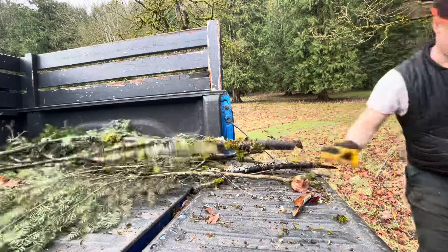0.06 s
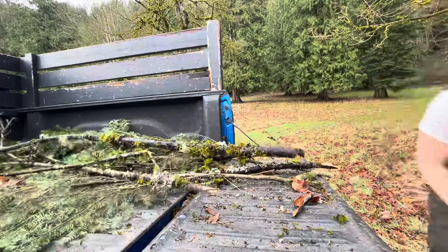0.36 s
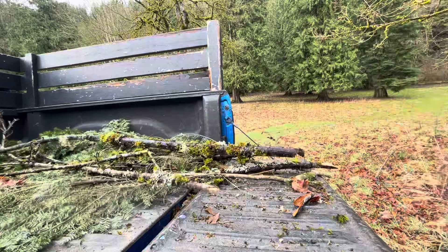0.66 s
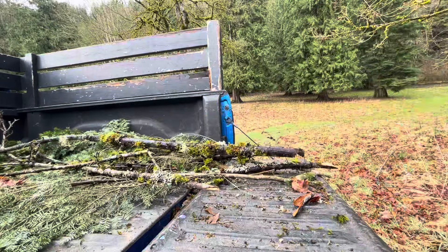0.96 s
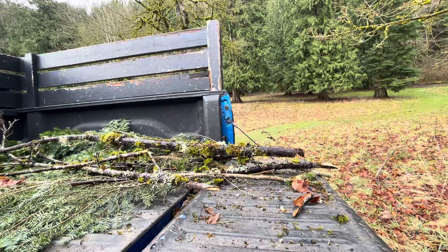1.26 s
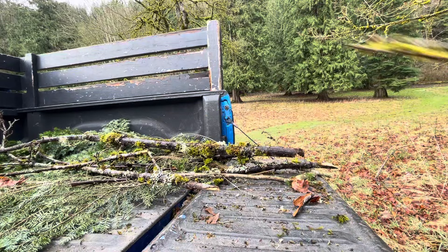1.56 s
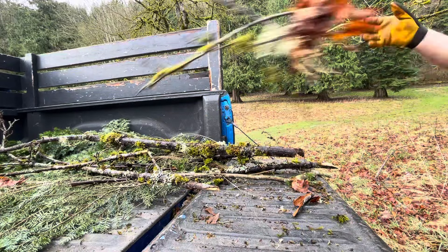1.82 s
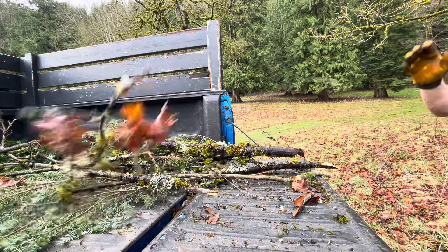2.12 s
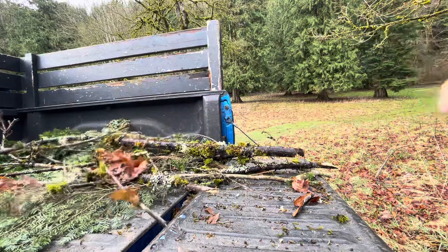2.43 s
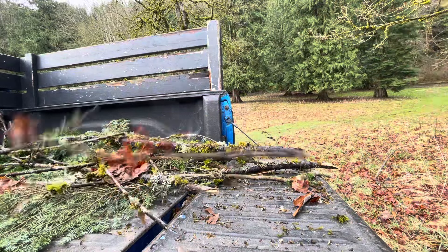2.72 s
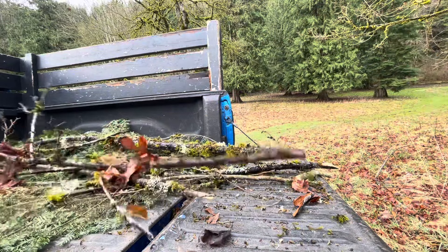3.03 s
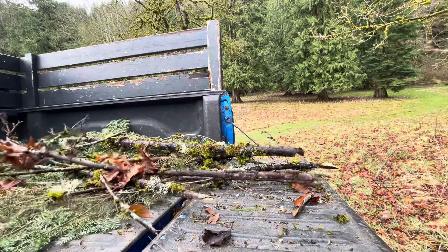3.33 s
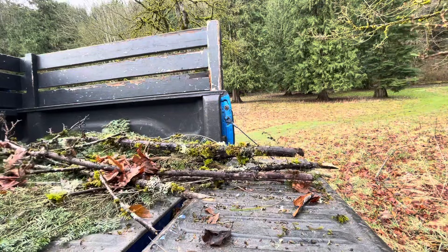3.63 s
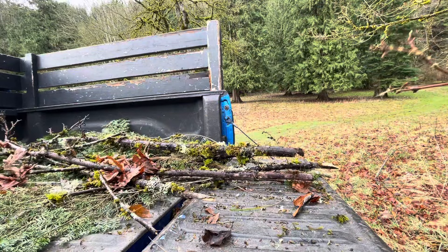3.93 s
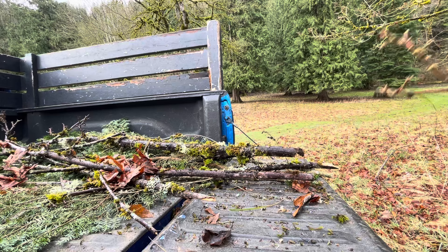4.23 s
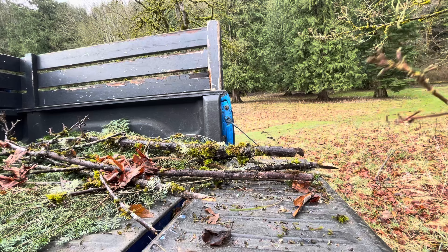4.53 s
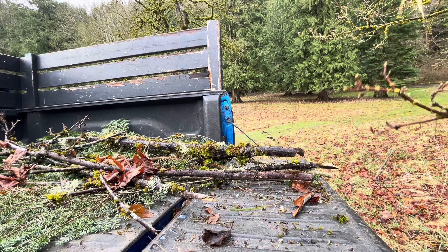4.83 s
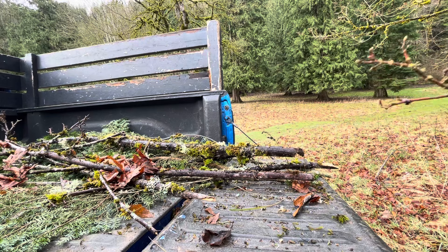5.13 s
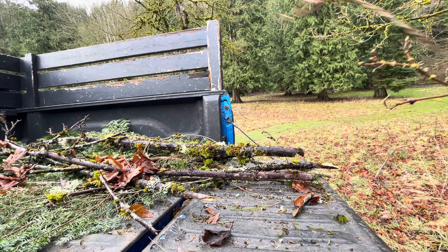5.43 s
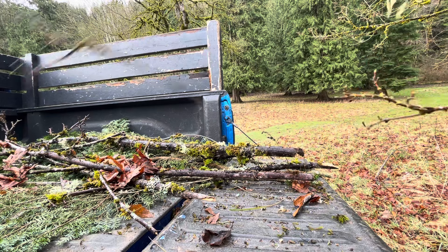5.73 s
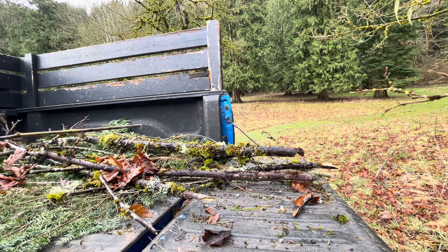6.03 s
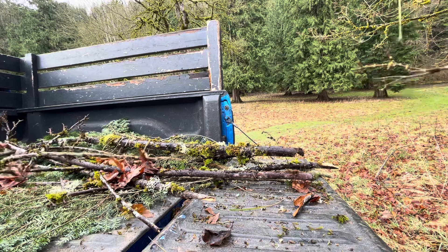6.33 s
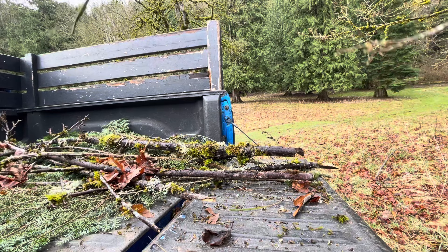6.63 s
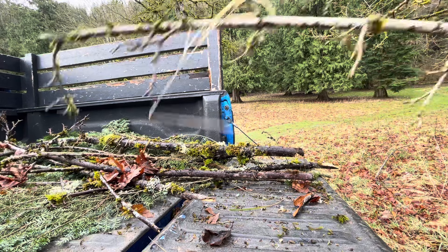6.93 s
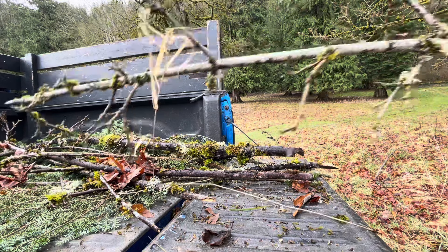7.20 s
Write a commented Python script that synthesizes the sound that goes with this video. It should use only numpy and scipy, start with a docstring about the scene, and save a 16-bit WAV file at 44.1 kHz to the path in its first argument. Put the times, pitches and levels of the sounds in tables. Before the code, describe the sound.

Branches knock and clatter onto a brush pile in a booming truck bed, and a stick snaps sharply between throws.

```python
"""On a pasture, branches are tossed onto a pile in the bed of a pickup truck.
Each landing knocks and makes the bed boom while twigs crack and the pile rustles and settles.
Between throws, someone walks through fallen leaves and snaps a stick, whose halves ring.
The trees send back a faint echo over quiet air."""
import sys
import numpy as np
from scipy import signal
from scipy.fft import rfft, irfft, next_fast_len
from scipy.io import wavfile
from scipy.ndimage import uniform_filter1d

SR = 44100
rng = np.random.default_rng(int(sys.argv[2]) if len(sys.argv) > 2 else 0)


def generate_wav(sig):
    """Save sig (samples, or channels by samples) to the path in sys.argv[1] as 16-bit PCM at SR."""
    pcm = np.round(np.clip(np.atleast_2d(sig).T, -1, 1) * 32767).astype(np.int16)
    wavfile.write(sys.argv[1], SR, pcm)


N = 328986
TIME_S = np.arange(N) / SR
PILE_LAG_S, FIELD_LAG_S = -.00026, .00028   # arrival at the left microphone minus the right

# Blows of wood on wood and on the bed; pan is left minus right throughout:
# start_s, thud_db, pitch_hz, ring_db, ring_t60_s, boom_db, bark_db, pan_db
BLOWS = [(-0.04, -53, 140, -42, 0.41, -43, -52, 12), (0.07, -45, 150, -61, 0.18, -48, -70, 11),
         (0.123, -50.5, 722, -40.5, 0.18, -44, -40, 4), (0.189, -44.5, 438, -49, 0.18, -56, -48, 4),
         (0.74, -51.5, 424, -36.5, 0.051, -83, -46.5, -6.5), (1.243, -63, 560, -43, .04, -90, -49, -2),
         (2.013, -48, 460, -62, .2, -47.5, -66, 5.5), (2.08, -35.5, 96.7, -30, 0.45, -36, -42, 9.5),
         (2.115, -35, 113, -42, 0.14, -41, -35, 6), (2.1636, -19.5, 336, -4.5, 0.14, -35, -29.5, 2.5),
         (2.175, -29.5, 483, -16, 0.17, -42, -51.5, 3.5), (2.203, -33, 397, -17.5, 0.27, -38, -54, 4),
         (2.305, -20.5, 470, -27, 0.085, -39.5, -26, 3.5), (2.33, -37.5, 629, -27.5, 0.15, -46, -46, 20),
         (2.466, -40, 450, -48, 0.14, -46.5, -42, 7.5), (2.622, -14.5, 496, -9, 0.085, -28, -17, 7.5),
         (2.635, -19, 284.8, -13.5, 0.23, -35, -44, 3),
         (2.692, -25.5, 282.5, -24.5, 0.27, -34.5, -47, 13.5),
         (2.770, -22.5, 403, -21, 0.13, -34, -22.5, 2.5), (2.826, -39, 66, -26, 0.28, -46, -60, 1),
         (2.817, -33, 581, -36, 0.37, -38, -46, 11), (2.874, -24.5, 86, -26.5, 0.1, -38, -56, 14),
         (2.929, -28.5, 103, -27, 0.16, -50, -67, 11.5), (3.008, -44, 410, -36, 0.27, -51, -73, 5),
         (3.055, -30, 530, -31, 0.13, -38, -45, 8.5), (3.079, -32.5, 305, -28, 0.21, -40, -51, 10),
         (3.138, -37, 519, -35, 0.16, -38, -46.5, 10), (3.169, -47, 89.7, -31, 0.32, -39.5, -66, 20.5),
         (3.178, -34, 274, -22.5, 0.18, -61, -61, 7), (3.239, -44.5, 254.6, -41, 0.51, -51.5, -44, 7),
         (3.359, -64, 279, -56, 0.36, -63, -59, -1), (3.5, -61, 269.4, -56.5, 0.42, -65.5, -73.5, 9.5),
         (5.851, -52, 406, -38.5, 0.14, -62, -39.5, -0.5), (5.893, -46, 538, -32.5, 0.2, -63, -49, 1),
         (5.907, -31.5, 150.4, -21.5, 0.17, -51.5, -52.5, 8),
         (5.911, -26.5, 474, -17.5, .14, -47, -21, 2.5), (5.918, -30, 313.3, -16, 0.21, -40.5, -35, 3.5),
         (5.921, -44, 627, -28.5, 0.21, -53, -33, 7), (5.93, -30.5, 174, -11, 0.1, -46, -28, 10.5),
         (5.939, -30.5, 399.7, -19, 0.21, -54.5, -35, 4.5), (5.974, -48, 188, -26.5, 0.28, -63, -68, 10.5),
         (6.04, -54.5, 299.6, -39, 0.21, -68.5, -70, 3.5), (6.13, -56, 191.6, -42.5, 0.4, -76, -76, 4),
         (6.208, -47, 411.6, -34, 0.27, -51, -49.5, 4.5), (6.255, -46.5, 135.6, -42, 0.36, -53.5, -50, 11),
         (6.998, -50, 729, -44, 0.29, -62, -43, 6), (7.041, -54.5, 186, -59, 0.18, -65, -40.5, 7.5)]
# Boots crushing leaves: peak_s, level_db, swell_s, fade_s, treble_db
LEAF_CRUNCHES = [(0.771, -49, 0.063, 0.13, -0.5), (0.812, -49.5, 0.043, 0.023, -5),
                 (1.375, -51, 0.087, .05, -3.5), (1.42, -50.5, 0.075, 0.11, 4.5),
                 (1.475, -50, 0.038, 0.057, -17), (1.637, -43.5, 0.04, .11, 4.5),
                 (4.006, -51.5, 0.037, 0.12, 1), (4.06, -51.5, 0.09, 0.14, 1),
                 (7.222, -50, 0.21, 0.202, 0.5)]
# Feet and boughs sweeping over leaves: peak_s, level_db, swell_s, fade_s, treble_db
LEAF_SWISHES = [(0.982, -53.5, 0.063, 0.072, 0.5), (1.095, -51.5, 0.1, 0.15, -1.5),
                (1.54, -62, .1, 0.63, 0), (1.879, -58, 0.3, 0.11, 2), (3.6, -57.5, 0.37, 0.14, -4.5),
                (3.772, -54, 0.1, 0.1, -5), (3.9, -65.5, .2, 0.16, 2), (4.2, -65, 0.11, 0.31, 1),
                (4.74, -60.5, 0.11, 0.21, 2), (5.0, -66.5, 0.51, 0.88, -8.5), (5.25, -67, 0.052, .15, -1),
                (5.36, -60.5, 0.12, 0.13, -2), (5.55, -64.5, 0.1, 0.086, -8), (5.68, -57.5, 0.074, .15, -2),
                (5.76, -54, 0.16, 0.16, -2), (6.641, -49, 0.049, 0.087, 2), (6.73, -63, 0.077, 0.33, 3),
                (6.96, -74, 0.041, .1, 11.5), (7.04, -55, 0.11, 0.054, 2), (7.13, -59, .1, .1, 2),
                (7.45, -63, 0.13, 0.31, 2)]


def branch_landings(thud_spread=1.428, mode_reach=2.8, contact_s=0.0032):
    """Each blow gives a dull thud, a ring of the branch's bending mode, a bark clack and a bed boom."""
    # Truck bed modes: mode_hz, level_db, t60_s
    bed_modes = [(68, -5, 0.7), (92, -4, 0.45), (133.5, -8, .4), (157.4, -7, 0.45), (176, -6.5, 0.33),
                 (205, -7, .4), (269.3, -1.5, 0.5), (320, -1.5, .36), (357, -4, 0.26), (399, -5, .3),
                 (495, -4, .28), (598, -2, .36), (679, -4, .36), (745, -6, .32), (1192, -17.5, 0.3),
                 (1312, -16, .3), (1463, -20, .26)]
    out, t = np.zeros((2, N)), np.arange(int(.6 * SR)) / SR
    modes_hz = np.array(bed_modes)[:, 0]
    modes = np.array([damped_mode(t, *mode) for mode in bed_modes])
    cushion = 1 - np.exp(-t / contact_s)   # moss and needles soften the blow
    for start_s, thud_db, pitch_hz, ring_db, ring_t60_s, boom_db, bark_db, pan_db in BLOWS:
        thud_t60_s = 0.22 * np.exp(-0.0058 * (thud_db + 21))   # hard blows bury the branch
        knock = burst(t, pitch_hz / thud_spread, pitch_hz * thud_spread, thud_t60_s)
        knock *= from_db(thud_db + 0.5)
        knock[0] += damped_mode(t, pitch_hz, ring_db, ring_t60_s)   # direct path only
        signs = rng.choice([-1, 1], (2, len(modes)))
        strengths = signs * from_db(rng.normal(0, 4.065, signs.shape))   # depend on where it lands
        softness = 1 / np.hypot(1, (modes_hz / (mode_reach * pitch_hz)) ** 2)   # dull blows miss highs
        boom = from_db(boom_db - 1) * (strengths * softness) @ modes
        clack = from_db(bark_db - 9) * burst(t, low_hz=700, high_hz=1600, t60_s=0.15)
        add(out, start_s, placed((knock + boom + clack) * cushion, 0, pan_db, PILE_LAG_S))
    return out


def pile_rustle():
    """Twigs and needles rub as the pile gives under a branch and settles."""
    # Shifts of the pile: peak_s, level_db, swell_s, fade_s
    shifts = [(0.02, -64.5, 0.19, 1), (0.19, -53, 0.93, 0.36), (2.07, -44.5, 0.15, 0.48),
              (2.178, -37, 0.043, 0.14), (2.31, -58.5, 0.22, 0.41), (2.63, -52, 0.014, 0.13),
              (2.765, -40, 0.032, 0.17), (2.98, -53.5, 0.35, 0.91), (5.91, -34, 0.035, 0.035),
              (5.978, -45, 0.015, 0.023), (6.205, -52.5, 0.056, 0.22)]
    # Rustle spectrum: freq_hz, density_db
    spectrum = [(300, -2), (900, -2.5), (1500, 1), (2500, 0.5), (4000, 1.5), (6000, 2), (8000, -2),
                (12000, -4.5), (16000, -6)]
    rustle = coloured(crackle(per_s=7700, size_db=3.0, clump_db=1.25), spectrum)
    return from_db(0.5) * swells(shifts) * placed(rustle, side_db=0, pan_db=5.5, lag_s=PILE_LAG_S)


def bed_rumble(build_s=0.02, t60_s=0.83):
    """Loose wood rattles after each blow and keeps the bed rumbling."""
    # Rumble spectrum: freq_hz, density_db
    spectrum = [(25, -42.5), (45, -28), (65, 4), (130, 4.5), (300, -1.5), (500, -4), (750, -14.5),
                (1100, -55), (2500, -42)]
    power, t = np.zeros(N), np.arange(2 * SR) / SR
    rattle = (1 - np.exp(-t / build_s)) * decay(t, t60_s)
    for start_s, *_, boom_db, _, _ in BLOWS:
        add(power, start_s, (from_db(boom_db) * rattle) ** 2)
    rumble = coloured(crackle(per_s=1600, size_db=1.0, clump_db=2.0), spectrum)
    return from_db(-0.5) * np.sqrt(power) * placed(rumble, side_db=3.5, pan_db=7.5, lag_s=PILE_LAG_S)


def opposed_bass(x, edge_hz=76, right_db=-4.5, lift_db=5.5):
    """The bed's deep boom is lifted and reaches the two channels in opposite phase."""
    size = next_fast_len(N + 4000)
    freq_hz = np.fft.rfftfreq(size, 1 / SR)
    left, right = rfft(x, size)
    deep = 1 / (1 + (freq_hz / edge_hz) ** 4)
    right = np.sqrt(1 - deep) * right - deep * from_db(right_db) * left
    return irfft(np.array([left, right]) * from_db(lift_db * deep), size)[:, :N]


def stick_break(start_s=4.5369, travel_1khz_s=0.003, chirp_s=4.5374, chirp_hz=8600, swell_s=.00062):
    """High bending waves outrun low ones, so the crack sweeps down; the halves ring."""
    # Crack spectrum: freq_hz, density_db
    spectrum = [(60, -36), (150, -25), (240, 4), (400, 14), (500, 11), (620, 2), (820, 3.5), (1200, -6),
                (1800, 1), (2700, 4), (4000, -1), (6300, 5), (9000, -5), (14000, -13)]
    # Modes of the broken halves: mode_hz, level_db, t60_s
    stick_modes = [(438, -37, .12), (1700, -35.5, 0.089), (2270, -43, 0.09), (2625, -31, 0.051),
                   (3490, -29, 0.042), (3990, -33.5, .04)]
    out, t = np.zeros((2, N)), np.arange(SR // 5) / SR
    freq_hz = np.maximum(np.fft.rfftfreq(len(t), 1 / SR), 1)
    phase_rad = 4 * np.pi * travel_1khz_s * np.sqrt(1000 * freq_hz)
    sweep = irfft(unit_rms(spectrum_gain(freq_hz, spectrum)) * np.exp(-1j * phase_rad))
    add(out, start_s, from_db(1.5) * sweep * pan_gains(3.5))
    ring = sum(damped_mode(t, *mode) for mode in stick_modes)
    add(out, start_s + travel_1khz_s, ring * pan_gains(0.5))
    # A brief shrill chirp swells at the onset of the crack
    chirp = np.sin(2 * np.pi * chirp_hz * t) * np.exp(-np.abs(t - t.mean()) / swell_s)
    add(out, chirp_s - t.mean(), from_db(-11) * chirp * pan_gains(-5))
    return out


def twig_cracks(spread=1.37, mode_ratio=1.45, half_width_hz=75, scatter_db=-25, scatter_t60_s=0.26):
    """A twig gives way in a spray of splitting fibres and resonates; things nearby scatter the sound."""
    # Cracking twigs: start_s, level_db, centre_hz, t60_s, pan_db
    cracks = [(0.125, -42, 2320, 0.056, 7), (0.189, -36, 1840, 0.14, 1), (0.544, -49.5, 5140, 0.049, 12.5),
              (0.6538, -49, 4700, 0.089, -4), (0.7455, -36.5, 7200, 0.018, 3),
              (1.245, -38, 3000, 0.028, -5), (1.252, -45.5, 7500, 0.017, -2), (1.274, -42.5, 6500, .016, 3),
              (1.3590, -47, 3630, 0.022, -2), (1.3754, -53, 3400, .02, -7), (1.47, -43, 6960, .02, 0),
              (1.567, -38.5, 6870, 0.014, 6), (1.8671, -41, 3000, 0.025, 2), (1.923, -45.5, 8900, 0.017, 3),
              (1.9945, -64, 5000, 0.014, -2), (2.025, -41, 6500, 0.041, 10), (2.072, -33, 5700, 0.023, 8),
              (2.122, -36, 3700, .02, 4), (2.1626, -30.5, 4250, 0.06, 7), (2.198, -32, 6000, 0.036, 3),
              (2.308, -31, 2300, 0.025, 1), (2.385, -40, 9200, 0.012, -3), (2.626, -23.5, 2400, 0.045, 2),
              (2.747, -48, 2350, .02, 1), (2.759, -22, 3140, 0.013, 14), (2.7595, -36, 5170, 0.014, 4),
              (2.773, -29, 2640, 0.18, 1.5), (3.058, -43, 2430, 0.077, 1), (3.114, -41, 3000, .02, 2),
              (3.139, -39, 1300, .03, 2), (3.2437, -41, 1500, 0.031, 2), (3.342, -44, 8900, 0.0089, 4),
              (3.4654, -40, 5770, 0.018, 10.5), (3.9867, -39.5, 5000, 0.016, -4),
              (4.153, -51, 8000, 0.015, -5), (4.334, -48.5, 3720, 0.013, -2.5),
              (4.492, -44.5, 9280, 0.0077, -0.5), (4.5384, -9, 5620, 0.01, 3.5),
              (4.544, -26, 7000, 0.026, 7), (4.552, -19, 5120, 0.021, 9), (4.5878, -45, 6900, .012, 5),
              (4.5937, -23.5, 6480, 0.015, 6), (4.600, -30, 8200, 0.014, -3),
              (4.6045, -27.5, 7000, 0.021, 0), (4.610, -30, 5220, 0.022, -4),
              (4.865, -52.5, 5940, 0.039, 2), (5.0815, -51.5, 3580, .015, 11),
              (5.176, -53.5, 6980, 0.01, 7.5), (5.1946, -54, 3600, .012, 9), (5.35, -62, 6000, 0.0072, 7),
              (5.4976, -44, 3100, 0.013, 1.5), (5.852, -29.5, 4480, 0.041, 0),
              (5.863, -26, 3670, .025, 1.5), (5.897, -37, 5700, 0.025, 12), (5.905, -14, 5780, 0.011, 0.5),
              (5.909, -20.5, 3000, .035, -5), (5.916, -16.5, 2520, 0.054, 1), (5.9355, -30, 6000, 0.01, 6),
              (5.937, -25, 2540, 0.067, 5), (5.948, -42, 5000, .014, 4), (5.9696, -23, 8540, 0.014, 1.5),
              (5.97, -19.5, 3380, 0.013, 1), (5.985, -28, 4350, 0.01, 5), (6.09, -46.5, 4950, 0.147, 5),
              (6.1921, -37, 6000, 0.032, 5), (6.5949, -46.5, 7930, 0.0075, 1),
              (6.6476, -44.5, 8400, 0.015, -6.5), (6.7106, -48, 8800, 0.019, 0.5),
              (6.83, -51, 7000, .01, -5), (6.8708, -43.5, 3600, 0.0091, 0), (6.938, -46.5, 9660, 0.02, 0),
              (7.0378, -38, 8180, 0.011, -5.5), (7.154, -44, 8000, 0.007, -13),
              (7.158, -31, 6500, 0.018, -1)]
    out, t = np.zeros((2, N)), np.arange(SR // 4) / SR
    for start_s, level_db, centre_hz, t60_s, pan_db in cracks + twig_ticks():
        noise = rng.standard_normal((2, len(t)))
        fibres_db = 2 * np.repeat(rng.standard_normal(len(t)), 25)[:len(t)]
        envelope = decay(t, t60_s) + from_db(scatter_db) * decay(t, scatter_t60_s)
        spray = noise * from_db(fibres_db) * envelope
        crack = band(spray, centre_hz / spread, centre_hz * spread, order=1)
        for mode_hz in (centre_hz / mode_ratio, centre_hz, centre_hz * mode_ratio):
            crack += from_db(1) * band(spray, mode_hz - half_width_hz, mode_hz + half_width_hz, order=1)
        crack *= from_db(level_db - 3.5)
        lag_s = PILE_LAG_S if pan_db > 1.5 else FIELD_LAG_S
        add(out, start_s, placed(crack, side_db=1, pan_db=pan_db + 3.5, lag_s=lag_s))
    return out


def twig_ticks(per_s=33, range_db=8.5, centre_hz=4500, range_oct=1.7, t60_s=0.012):
    """Crack rows for small twigs giving way at random; their level follows the leaves' rustle."""
    rustle_db = 20 * np.log10(swells(LEAF_SWISHES + LEAF_CRUNCHES))
    rows = []
    for when, size, pitch in rng.random((round(per_s * N / SR), 3)):
        level_db = rustle_db[int(when * N)] + 1 + range_db * (size - .5)
        pitch_hz = centre_hz * 2 ** (range_oct * (pitch - .5))
        rows.append((when * N / SR, level_db, pitch_hz, t60_s, 0))
    return rows


def leaf_rustle(rows, spectrum, contacts, crisp_hz=6200):
    """Damp fallen leaves give a fine, dense crackle, crisper where they are drier."""
    grains = placed(coloured(contacts, spectrum), side_db=-0.5, pan_db=2, lag_s=FIELD_LAG_S)
    soft = signal.sosfiltfilt(signal.butter(2, crisp_hz, fs=SR, output="sos"), grains)
    crisp_rows = [(peak_s, level_db + treble_db, swell_s, fade_s)
                  for peak_s, level_db, swell_s, fade_s, treble_db in rows]
    return swells(rows) * soft + swells(crisp_rows) * (grains - soft)


def leaves():
    """Boots crush the leaves in coarse grains; feet and boughs sweep them in finer ones."""
    # Crushed leaves: freq_hz, density_db
    crunch_spectrum = [(40, -16.5), (100, 2.5), (250, 0.5), (800, -2.5), (1500, 0.5), (2300, -5),
                       (3000, 5.5), (3600, 8.5), (4700, -2), (6100, 2.5), (7300, 0), (8500, 2), (12000, -7),
                       (16000, -1.5)]
    # Swept leaves: freq_hz, density_db
    swish_spectrum = [(40, -15.5), (100, -3), (250, -3), (700, 1), (1400, -2.5), (2200, -2), (3400, 7),
                      (4500, -0.5), (6200, 5), (7500, -0.5), (9000, -1), (12000, -11), (16000, -6)]
    crunch = leaf_rustle(LEAF_CRUNCHES, crunch_spectrum, crackle(per_s=2800, size_db=3.0, clump_db=2.0))
    swish = leaf_rustle(LEAF_SWISHES, swish_spectrum, crackle(per_s=5500, size_db=2.6, clump_db=1.4))
    return from_db(1) * crunch + swish


def footfalls(contact_s=0.0032):
    """A boot presses into the turf with a soft scuff."""
    # Steps on soft ground: start_s, level_db
    steps = [(0.735, -57.5), (0.81, -75), (1.39, -53), (1.46, -60.5), (3.985, -57.5), (4.05, -60),
             (4.15, -64), (6.62, -65)]
    out, t = np.zeros((2, N)), np.arange(SR // 2) / SR
    cushion = 1 - np.exp(-t / contact_s)
    for start_s, level_db in steps:
        thud = from_db(level_db) * burst(t, low_hz=190, high_hz=600, t60_s=0.55) * cushion
        add(out, start_s, placed(thud, side_db=2, pan_db=-0.5, lag_s=FIELD_LAG_S))
    return out


def tree_echo(x, level_db, delay_s, width_s, ground_db, ground_t60_s):
    """The ground and the tree line return a smeared, duller echo."""
    t = np.arange(SR) / SR
    envelope = np.exp(-((t - delay_s) / width_s) ** 2) + from_db(ground_db) * decay(t, ground_t60_s)
    response = band(rng.standard_normal((2, SR)), 420, 4800, order=4) * envelope
    return from_db(level_db) * signal.fftconvolve(x, unit_rms(response) / np.sqrt(SR), axes=1)[:, :N]


def pasture_air(level_db=-64.5):
    """Quiet, steady noise of the open air."""
    # Air spectrum: freq_hz, density_db
    spectrum = [(20, -14), (45, -5), (80, 0), (160, -8.5), (300, -9), (550, 2), (900, -6), (1350, -3),
                (2100, -17), (3500, -20), (6500, -21.5), (11000, -38), (16000, -47.5)]
    air = coloured(rng.standard_normal((2, N)), spectrum)
    return from_db(level_db) * placed(air, side_db=-3.5, pan_db=5, lag_s=.0006)


def from_db(db):
    """Decibels to gain."""
    return 10 ** (np.asarray(db) / 20)


def unit_rms(x):
    """Scale to unit power."""
    return x / np.sqrt(np.mean(x ** 2) + 1e-20)


def decay(t, t60_s):
    """Exponential fall of 60 dB per t60_s."""
    return np.exp(-np.log(1000) * t / t60_s)


def damped_mode(t, mode_hz, level_db, t60_s):
    """One struck resonance."""
    return from_db(level_db) * np.sin(2 * np.pi * mode_hz * t) * decay(t, t60_s)


def band(x, low_hz, high_hz, order=2):
    """Butterworth band-pass."""
    high_hz = min(high_hz, .47 * SR)
    low_hz = min(low_hz, high_hz / 1.1)
    return signal.sosfilt(signal.butter(order, [low_hz, high_hz], "band", fs=SR, output="sos"), x)


def spectrum_gain(freq_hz, spectrum):
    """Gain between a spectrum's corners, interpolated over log frequency."""
    corners_hz, corners_db = np.transpose(spectrum)
    return from_db(np.interp(np.log(freq_hz), np.log(corners_hz), corners_db))


def coloured(x, spectrum):
    """Give x a smooth spectrum; unit power."""
    size = next_fast_len(N)
    freq_hz = np.maximum(np.fft.rfftfreq(size, 1 / SR), 1)
    return unit_rms(irfft(rfft(x, size) * spectrum_gain(freq_hz, spectrum), size)[..., :N])


def burst(t, low_hz, high_hz, t60_s):
    """Many close modes struck at once: an even band of noise that dies away."""
    noise = band(rng.standard_normal((2, len(t))), low_hz, high_hz, order=3)
    even = noise / np.sqrt(uniform_filter1d(noise ** 2, size=700) + 1e-12)
    return band(even * decay(t, t60_s), low_hz / 2, high_hz * 2)


def crackle(per_s, size_db, clump_db, clump_rate_hz=110):
    """Tiny contacts of very uneven size, louder in clumps."""
    contacts = rng.random((2, N)) < per_s / SR
    sizes = from_db(size_db * np.minimum(rng.exponential(1, (2, N)), 5))
    signs = rng.choice([-1, 1], (2, N))
    knots = rng.standard_normal(8000)
    clumps = unit_rms(np.interp(TIME_S * clump_rate_hz, np.arange(len(knots)), knots))
    return contacts * sizes * signs * from_db(clump_db * clumps)


def swells(rows):
    """Gain of overlapping rustles; each rises 20 dB in swell_s and falls 20 dB in fade_s."""
    power = 0
    for peak_s, level_db, swell_s, fade_s, *_ in rows:
        away = np.maximum((peak_s - TIME_S) / swell_s, (TIME_S - peak_s) / fade_s)
        power = power + from_db(level_db - 20 * np.minimum(away, 10)) ** 2
    return np.sqrt(power)


def add(out, start_s, sound):
    """Mix a sound in at start_s, which may be negative."""
    start = round(start_s * SR)
    sound, start = sound[..., max(-start, 0):], max(start, 0)
    out[..., start:start + sound.shape[-1]] += sound[..., :N - start]


def pan_gains(pan_db):
    """Left and right gain, pan_db apart."""
    return from_db([[pan_db / 2], [-pan_db / 2]])


def placed(pair, side_db, pan_db, lag_s):
    """A direct and a scattered signal at two microphones, with a level and time difference."""
    direct, scattered = pair
    side_gain = from_db(side_db)
    left, right = (direct + side_gain * scattered * [[1], [-1]]) / np.hypot(1, side_gain / 2)
    n, shift = np.arange(len(left)), round(lag_s * SR / 2)
    lagged = [np.interp(n - shift, n, left, 0, 0), np.interp(n + shift, n, right, 0, 0)]
    return pan_gains(pan_db) * np.array(lagged)


def scene():
    """Wood, leaves and their echo over quiet air; the stick, broken in the open, echoes most."""
    ground = leaves()
    truck = opposed_bass(branch_landings() + pile_rustle() + bed_rumble())
    near = truck + twig_cracks() + ground + footfalls()
    snap = stick_break()
    echo = tree_echo(near, level_db=-38.5, delay_s=0.29, width_s=0.092, ground_db=-6.5, ground_t60_s=.44)
    echo += tree_echo(snap, level_db=-14, delay_s=0.18, width_s=0.055, ground_db=19, ground_t60_s=.17)
    return near + snap + echo + pasture_air()


def record(dry, mono_above_hz=7700, crossover_width_hz=1200, cutoff_hz=15900):
    """One resonant microphone port feeds both channels' treble, the left slightly late; top is cut."""
    # Treble response of the port: freq_hz, gain_db
    port_response = [(7000, -1.5), (8200, -4.5), (9000, 7), (10300, 1.5), (11600, 13.5), (12500, 4.5),
                     (13200, -7.5), (14000, -25), (15000, -15), (16000, -25.5)]
    # Lag of the left channel: freq_hz, phase_rad
    left_lag = [(8300, 0), (9700, 3.0), (10600, 2.5), (11700, 7.5), (12700, 7), (13500, 7), (14200, 11.5),
                (14800, 14)]
    size = next_fast_len(N + 2000)
    freq_hz = np.fft.rfftfreq(size, 1 / SR)
    left, right = rfft(dry, size)
    mono = np.clip((freq_hz - mono_above_hz) / crossover_width_hz + .5, 0, .95)
    left = np.sqrt(1 - mono) * left + np.sqrt(mono) * right
    left *= np.exp(-1j * np.interp(freq_hz, *np.transpose(left_lag)))
    port_gain = from_db(np.interp(freq_hz, *np.transpose(port_response)))
    heard = irfft(np.array([left, right]) * port_gain, size)[:, :N]
    return signal.sosfilt(signal.ellip(10, .1, 80, cutoff_hz, fs=SR, output="sos"), heard)


dry = scene()
out = record(dry)
generate_wav(out)
```